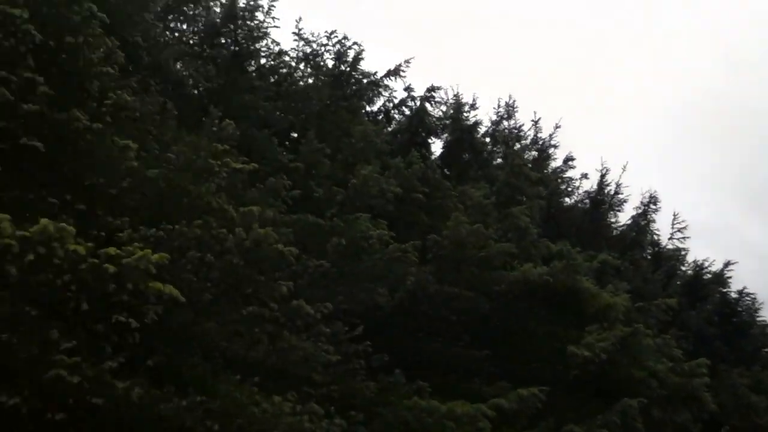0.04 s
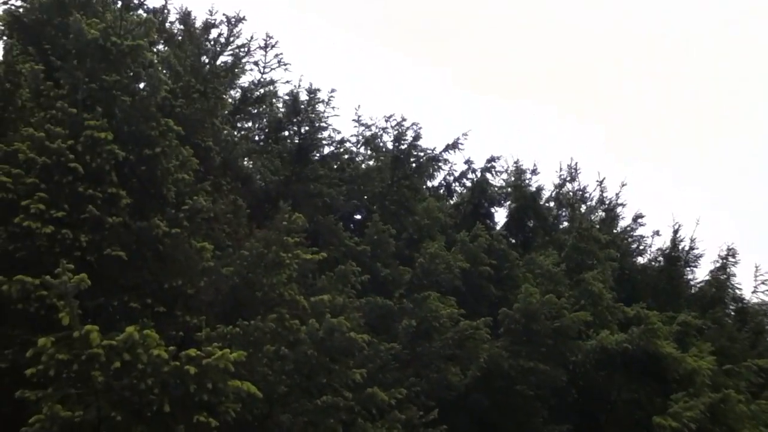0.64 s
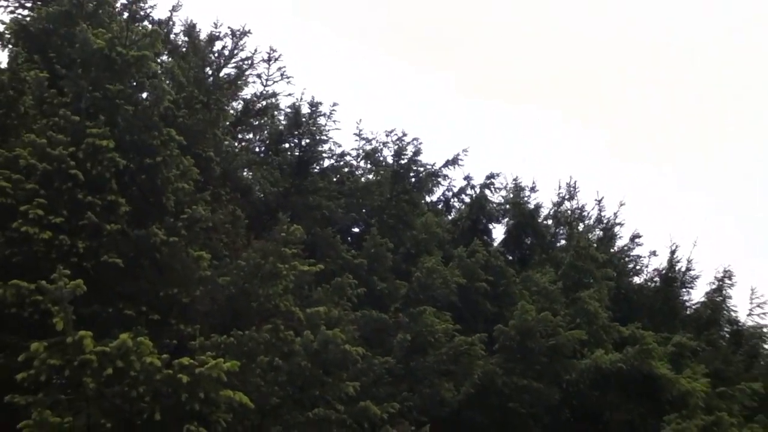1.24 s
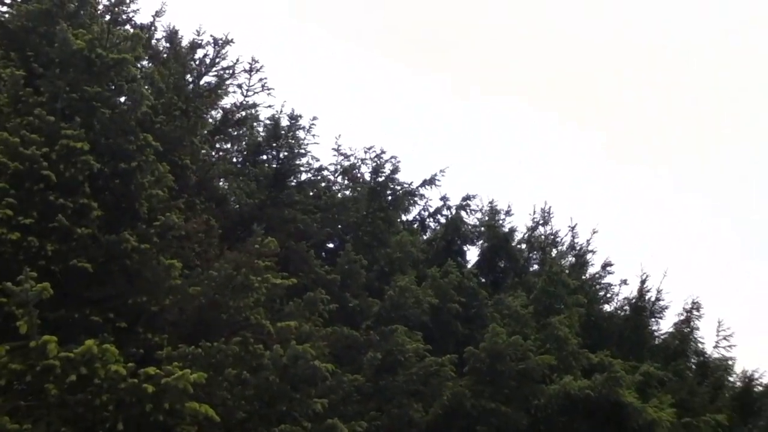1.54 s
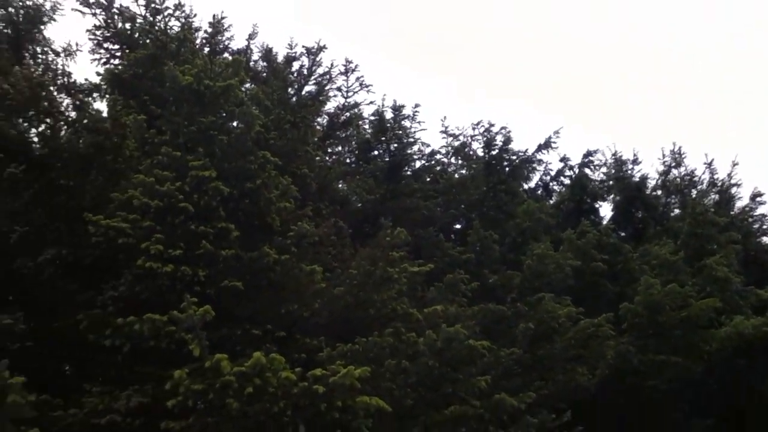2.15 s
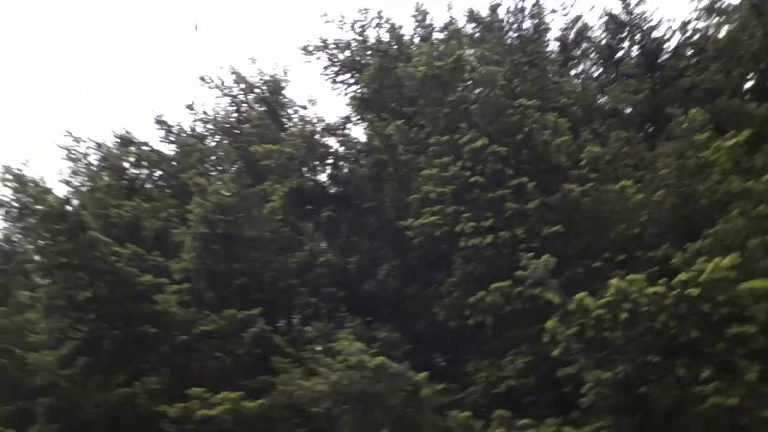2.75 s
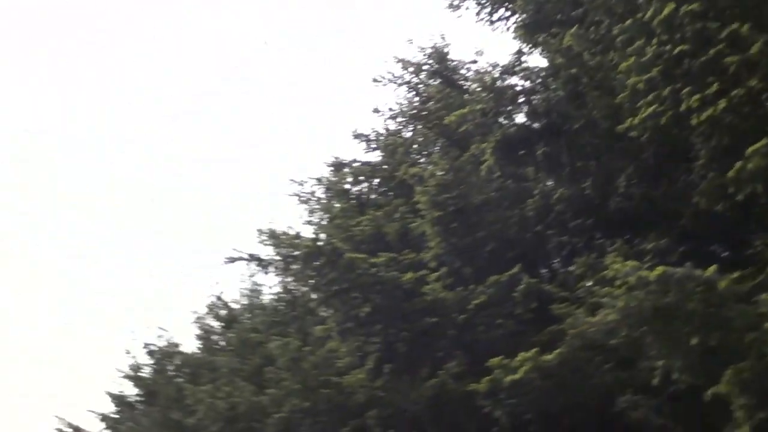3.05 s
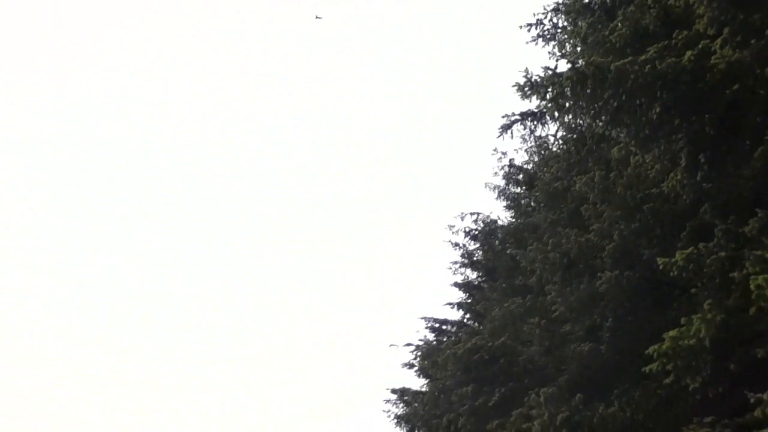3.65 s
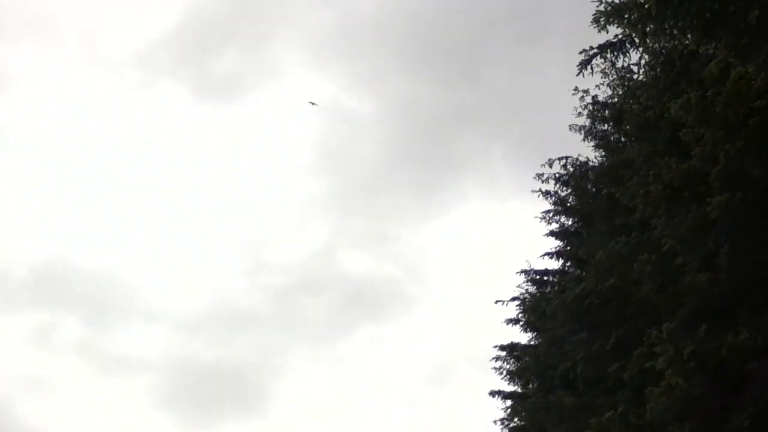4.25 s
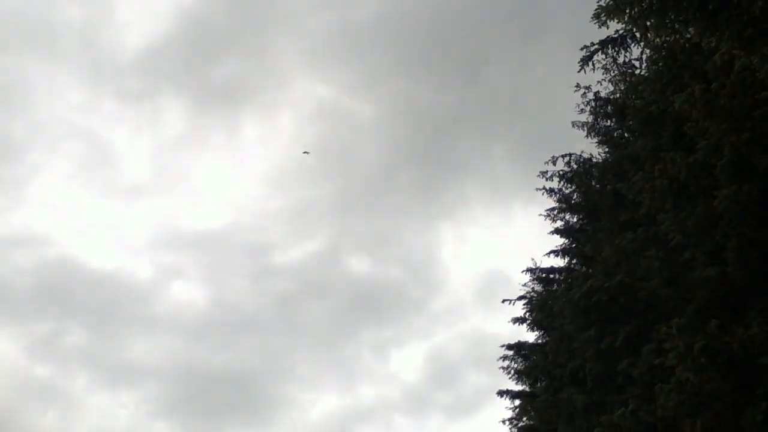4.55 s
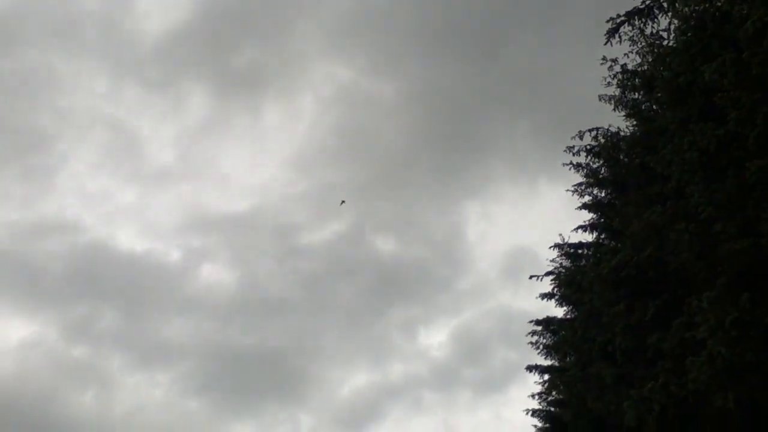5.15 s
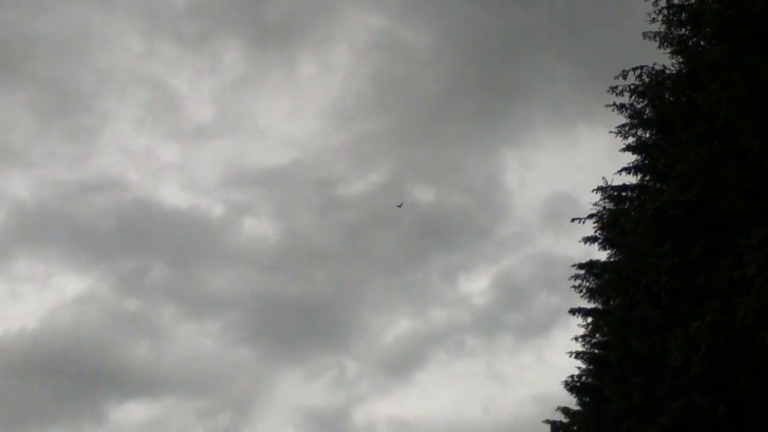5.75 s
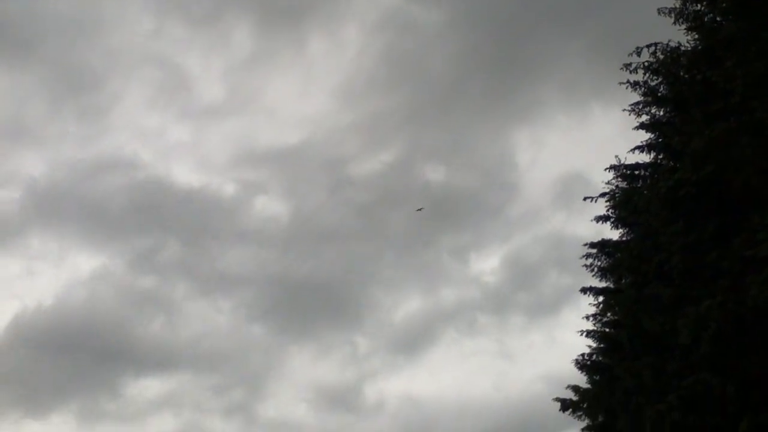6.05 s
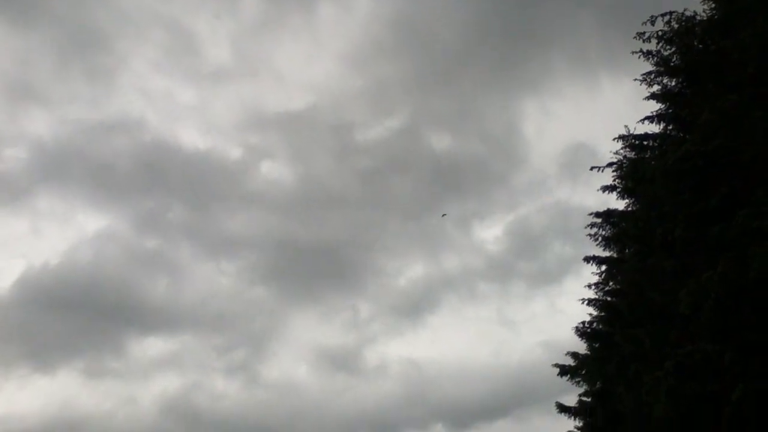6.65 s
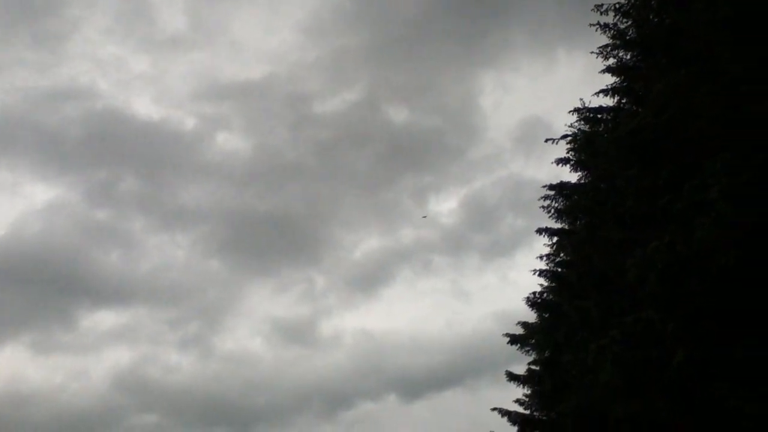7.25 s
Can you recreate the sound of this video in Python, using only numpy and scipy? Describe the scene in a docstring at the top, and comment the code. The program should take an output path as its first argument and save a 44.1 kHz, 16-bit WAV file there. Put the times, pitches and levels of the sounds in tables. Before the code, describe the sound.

A large bird calls overhead at the edge of an evergreen wood. From the start to about 1.8 seconds it gives five loud, short whistles that slide upward, several cracking into a higher note with a slight rasp. Each leaves a soft echo in the trees. During the pause, a hand-held camera makes a few small clicks and bumps between 2.5 and 3.3 seconds. The bird returns with a quick cluster of broken whistles from 3.5 to 4.2 seconds, overlapped near 3.7 by a tiny finger squeak and sharper clicks. From 5 seconds to the end comes a series of slightly longer rising whistles, about two a second, hoarse at first and ending on a softer, level note around 7 seconds. Small birds chirp faintly and occasionally in the distance. A light breeze, soft hiss and faint hand rubbing continue underneath.

```python
"""At the edge of a spruce wood a large bird circles, giving loud rising whistles that break between registers.
A membrane in its syrinx makes the tone, which throat and beak filter; irregular vibration adds rasps.
The ground reflects the calls and the trees scatter them; small birds chirp faintly over a light breeze.
A hand-held camera clicks, bumps and squeaks as it swings up to the sky."""
import sys
import numpy as np
from scipy import signal
from scipy.fft import rfft, irfft
from scipy.io import wavfile
from scipy.ndimage import map_coordinates

SR = 44100
rng = np.random.default_rng(int(sys.argv[2]) if len(sys.argv) > 2 else 0)


def waveform_to_disk(signal):
    """Save audio, clipped to [-1, 1], as 16-bit WAV at the path in sys.argv[1]."""
    frames = np.transpose(np.atleast_2d(signal))
    scaled = np.clip(frames, -1, 1) * 32767
    samples = np.round(scaled).astype(np.int16)
    wavfile.write(sys.argv[1], SR, samples)


N = 321930
T = np.arange(N) / SR
TOP_HZ = 15550  # upper band limit


def whistles(scoop_s=0.00767, accent_db=4.5, accent_s=0.013):
    """One push on the syrinx lifts pitch, level and overtones. Returns the calls and their ground bounce."""
    # Main-register calls: start t/s, end t/s, base f/Hz, creep/(Hz/s), crest t/s, lift/Hz, crest width/s,
    # scoop/Hz, base level/dB, crest level/dB, relative overtone level/dB, ground lag/s, bounce gain/dB
    calls = [ (0.154, 0.229, 1524, 1027, .225, 527, 0.025, 4, -55, -30, -13, .00811, -9.5),
             (0.631, 0.771, 1488, -610, .68, 412.5, .044, 9, -55.5, -33.5, -14, .00325, -7.5),
             (0.879, 1.015, 1574, 757, 1.0, 459.5, 0.023, -4, -44.5, -30, -9.5, .00954, -11.5),
             (1.378, 1.503, 1630, -800, 1.39, 90.5, 0.028, 93, -47, -36.5, -16.5, .00947, -9),
             (1.578, 1.749, 1572, 278, 1.746, 494, 0.036, 2.5, -46, -33.5, -9, .00974, -4),
             (3.568, 3.692, 1823, 924, 3.701, 169, 0.0059, -1, -42, -31, -20.5, .009, -14),
             (4, 4.093, 1830, -3440, 4.099, 503, 0.033, -3, -49, -43, -24, .00917, -10),
             (5.092, 5.151, 1573, -2000, 5.109, 315, 0.026, -0.5, -51, -31, -16.5, .0075, -14),
             (5.248, 5.534, 1599, 519.5, 5.5, 257.4, .034, -6, -47.5, -35.5, -11, .00652, 1),
             (5.804, 6.086, 1560, -7, 6.072, 433.5, 0.078, 137, -45.5, -38.5, -15.5, .00764, -3.5),
             (6.22, 6.442, 1718, 498, 6.43, 117.7, 0.032, 124, -41.5, -34.5, -16.5, .005, -3),
             (6.579, 6.806, 1689, -170, 6.802, 322, 0.045, 219, -46, -38, -14.5, .0061, -3), ]
    out, bounce = np.zeros(N), np.zeros(N)
    for (start, end, base_hz, creep, crest, lift_hz, width, scoop_hz,
         base_db, crest_db, bright_db, lag_s, bounce_db) in calls:
        t, gate = note_gate(start, end, release_s=0.02)
        age = np.maximum(t - start, 0)
        u = (t - crest) / width
        hz = base_hz + creep * age + lift_hz * push(u) - scoop_hz * np.exp(-age / scoop_s)
        swell = push((u + 0.42) / 1.65)  # the level peaks before the pitch, and more broadly
        accent = (scoop_hz > 0) * accent_db * np.exp(-(age / accent_s) ** 2)
        db = base_db + (crest_db - base_db) * swell + accent
        tone = voice(t, hz, overtone_db=bright_db - 5.5 + 4 * push(u), jitter=0.0021,
                     hoarse_jitter=0.07, slope_db=-0.26, flicker_db=3.5, flutter_db=0.5)
        call = gate * undb(db) * tone
        add(out, t[0], call)
        add(bounce, t[0], ground(call, lag_s, bounce_db))
    return out, bounce


def push(u):
    """Effort follows a Lorentzian peak; u is the time from the crest in crest widths."""
    return 1 / (1 + u ** 2)


def syrinx(hz, jitter):
    """The phase of a vibrating membrane is the integral of its trembling frequency."""
    return 2 * np.pi * np.cumsum(hz * (1 + jitter * walk(331.8, len(hz)))) / SR


def voice(t, hz, overtone_db, jitter, hoarse_jitter, slope_db, flicker_db, flutter_db=-0.25):
    """Source and filter: the harmonics of the syrinx sweep through the resonances of the throat."""
    # Transmission of throat and beak: f/Hz, gain/dB
    throat = [(2000, -25), (3200, 5), (3550, -2.5), (3950, -2), (4500, 2.5), (5100, 2), (5800, 1),
              (6700, -2), (7600, -3), (9000, -5), (11000, -15.5), (15000, -60)]
    # Treble loss as the bird turns away or flies further off: t/s, loss above the beak's corner/(dB/kHz)
    dullness = [(.2, 2.5), (.68, 0), (1.0, 2), (1.7, 2), (3.5, 10), (4.2, 11), (5.1, 0), (5.35, 3.5),
                (5.5, 3.5), (6.2, 5.5), (7.3, 5.5)]
    beak_corner_hz, doubling_depth = 4700, 0.31
    rough = roughness(t)
    phase = syrinx(hz, jitter + hoarse_jitter * rough)
    k = np.arange(2, 8)[:, None]  # harmonic numbers
    above_khz = np.maximum(k * hz - beak_corner_hz, 0) / 1000
    loss_db = above_khz * np.interp(t, *np.transpose(dullness))
    weights = gain_at(k * hz, throat) * undb(slope_db * k - loss_db) * (k * hz < TOP_HZ)
    weights /= np.linalg.norm(weights, axis=0)
    # moving air and crossing paths make each overtone fade on its own
    fading = undb(flicker_db * np.array([walk(61.8, len(t)) for _ in k]))
    overtones = (weights * fading * np.sin(k * phase)).sum(0)
    period_doubling = 1 + doubling_depth * rough * np.sin(phase / 2)  # alternate cycles differ
    tone = (np.sin(phase) + undb(overtone_db) * overtones) * period_doubling
    return np.sqrt(2) * tone * undb(flutter_db * walk(125.2, len(t)))


def soft_glides():
    """Short, soft frequency glides around the whistles, one faint echo and a tone overlapping one whistle."""
    # Soft tones: start t/s, end t/s, start f/Hz, middle f/Hz, end f/Hz, level/dB, relative overtones/dB
    notes = [(.265, .325, 1554, 1548, 1583, -48, -18), (.33, .4, 1550, 1555, 1540, -61.5, -18),
             (1.036, 1.104, 1528, 1576, 1725, -45, -21), (1.768, 1.845, 1520, 1525, 1483, -44.5, -18),
             (3.496, 3.525, 1717, 1780, 2040, -40.5, -20), (3.85, 3.871, 1728, 1790, 1980, -39, -14.5),
             (5.27, 5.395, 1840, 1880, 2000, -51, -15), (5.523, 5.575, 1813, 1703, 1773, -37.5, -23),
             (7.06, 7.31, 1530, 1489, 1484, -49, -14.5)]
    return glides(notes, overtone_db=-3.5, jitter=0.0018, hoarse_jitter=0.03, slope_db=-1.5, flicker_db=3.5)


def register_breaks():
    """The vibration jumps abruptly into a higher register."""
    # High notes: start t/s, end t/s, start f/Hz, middle f/Hz, end f/Hz, level/dB, relative overtones/dB
    notes = [(.226, .255, 2693, 2580, 2400, -40, -3), (1.002, 1.033, 2614, 2564, 2344, -40, -1.5),
             (1.737, 1.769, 2670, 2566, 2443, -39, -4), (3.526, 3.561, 2514, 2436, 2120, -44, -9.5),
             (3.702, 3.776, 2296, 2208, 2880, -40.5, -16), (3.873, 4.001, 2430, 2188, 2160, -45, -17.5),
             (4.094, 4.169, 2300, 2597, 2662, -45, -9.5), (5.011, 5.059, 2380, 2605, 2460, -41.5, -31),
             (5.399, 5.484, 2370, 2532, 2250, -45.5, -16), (6.076, 6.115, 2476, 2514, 2690, -41, -10),
             (6.438, 6.475, 2485, 2568, 2626, -41.5, -10), (6.803, 6.852, 2613, 2535, 2522, -41.5, -8)]
    return glides(notes, overtone_db=-7, jitter=0.0075, hoarse_jitter=0.04, slope_db=1, flicker_db=1.5)


def glides(notes, overtone_db, **timbre):
    """Frequency modulation: each note follows a parabola through three pitches."""
    out = np.zeros(N)
    for start, end, start_hz, middle_hz, end_hz, db, bright_db in notes:
        t, gate = note_gate(start, end)
        u = np.interp(t, [start, end], [-1, 1])
        bend_hz = (start_hz + end_hz) / 2 - middle_hz
        hz = middle_hz + u * (end_hz - start_hz) / 2 + u ** 2 * bend_hz
        add(out, t[0], gate * undb(db) * voice(t, hz, bright_db + overtone_db, **timbre))
    return out


def moans(jitter=0.0247, hoarse_jitter=0.23, swell_db=8.5):
    """A low harmonic series, strong in its first two partials, bends up and swells into a call."""
    # Low lead-in notes: start t/s, end t/s, start f/Hz, end f/Hz, relative level/dB
    notes = [(0, 0.147, 1009, 1162, -50.5), (.772, 0.873, 975, 1240, -48), (1.349, 1.377, 970, 1327, -42.5),
             (1.51, 1.569, 1024, 1214, -44.5), (5.182, 5.247, 958, 1190, -47),
             (5.78, 5.808, 936, 1113, -50), (6.188, 6.222, 985, 1160, -49.5),
             (6.571, 6.583, 980, 1180, -43.5), (7.034, 7.059, 948, 1230, -46.5)]
    out = np.zeros(N)
    for start, end, start_hz, end_hz, db in notes:
        t, gate = note_gate(start, end)
        u = np.interp(t, [start, end], [0, 1])
        hz = start_hz + (end_hz - start_hz) * u ** 3.2
        phase = syrinx(hz, jitter + hoarse_jitter * roughness(t))
        upper = sum(np.sin(k * phase) * 3 / k for k in range(3, 7))
        tone = np.sin(phase) + undb(3) * np.sin(2 * phase) + undb(-15) * upper
        add(out, t[0], np.sqrt(2) * gate * undb(db - 14.75 + swell_db * u) * tone)
    return out


def rasps(grain_db=0.5):
    """Aperiodic vibration: the membrane rattles before it locks on a pitch or as it jumps."""
    # Spectrum of the rattle: f/Hz, level/dB
    spectrum = [(500, -46), (850, -22), (1300, -3), (1750, 1), (2500, 3), (3000, -9.5), (3800, -2.5),
                (4500, -5), (5300, -11), (7500, -17), (11000, -29), (15000, -67)]
    rattle = unit(noise(spectrum) * undb(grain_db * walk(370)))
    return undb(-0.5) * hoarseness() * rattle


def hoarseness():
    """The amplitude envelope of the rattle is a sum of Gaussian pulses."""
    # Hoarse catches in the voice: centre t/s, duration/s, relative level/dB
    catches = [(0.247, 0.046, -51), (0.628, 0.051, -46), (1.016, 0.038, -63), (1.371, 0.035, -51.5),
               (1.754, 0.029, -56), (3.513, 0.036, -50.5), (5.019, 0.054, -52.5), (5.075, 0.036, -46),
               (5.086, 0.02, -39.5), (5.803, 0.031, -53.5), (6.213, 0.022, -54.5), (6.579, .015, -54)]
    return sum(undb(db) * np.exp(-(2 * (T - centre) / length) ** 2) for centre, length, db in catches)


def roughness(t):
    """Irregularity of the vibration at times t, normalised to 1 at its hoarsest."""
    envelope = hoarseness()
    return np.interp(t, T, envelope / envelope.max())


def ground(x, lag_s, bounce_db):
    """Two-path interference: a delayed reflection beats against the direct sound as the pitch glides."""
    t = T[:len(x)]
    return undb(bounce_db) * np.interp(t - lag_s, t, x, left=0)


def tree_echoes(bird, doppler=0.015, turn_hz=0.8):
    """Doppler effect: the bird nears some trees as it leaves others, so the echoes spread in pitch."""
    # Strength of the call towards the trees: t/s, gain/dB
    exposure = [(0, 4.5), (2, 6), (3.5, 0), (4.2, 9), (5, 2.5), (7.3, 9.5)]
    incident = bird * undb(np.interp(T, *np.transpose(exposure)))
    out = np.zeros(N)
    for bearing in np.linspace(0, 2 * np.pi, 3, endpoint=False):
        lag_s = doppler / (2 * np.pi * turn_hz) * (1 + np.sin(2 * np.pi * turn_hz * T + bearing))
        shifted = np.interp(T - lag_s, T, incident, left=0)
        out += wood(shifted, wet_db=-19, t60=0.98, near_s=0.053, near_db=5)
    return out


def wood(x, wet_db, t60, near_s, near_db):
    """Diffuse scattering: near twigs give a short bright return, countless branches a long dull tail."""
    # Spectrum of the reverberant tail: f/Hz, level/dB
    tail_spectrum = [(500, 5), (1600, -3), (2600, -2), (4200, 0.5), (6000, -7.5), (10000, -19)]
    # Spectrum of the near scatter: f/Hz, level/dB
    twig_spectrum = [(500, -40), (1700, -5), (2600, -1), (6000, 3), (10000, 5)]
    t = T[:2 * SR]
    tail = noise(tail_spectrum, len(t)) * np.exp(-np.log(1000) * t / t60)
    near = noise(twig_spectrum, len(t)) * np.exp(-t / near_s)
    build_up = 1 - np.exp(-t / 0.0013)
    tail_energy = SR * t60 / (2 * np.log(1000))
    response = (tail + undb(near_db) * near) * build_up / np.sqrt(tail_energy)
    return undb(wet_db) * signal.fftconvolve(x, response)[:N]


def camera_knocks(crack_db=-3, hard_tick_hz=1540, casing_hz=3500):
    """Each impact excites a damped mode and a crack of noise, both low-passed by the casing."""
    # Clicks and bumps of the camera body: t/s, relative level/dB, ring f/Hz, 60 dB decay time/s
    knocks = [(2.464, -44.5, 940, 0.0056), (2.711, -47, 700, .012), (2.743, -33.5, 1700, 0.0017),
              (2.7455, -37.5, 640, 0.0066), (2.7663, -34.5, 1700, 0.0027), (2.8481, -38, 1210, 0.0054),
              (3.2834, -38.5, 450, 0.01), (3.512, -57, 54.6, .15), (3.717, -44.5, 930, 0.047),
              (3.722, -21.5, 1540, 0.00093), (3.738, -31.5, 1510, 0.0059), (3.745, -36, 950, 0.0047),
              (3.761, -44.5, 406, 0.043), (3.768, -35, 1060, 0.0024)]
    out, t = np.zeros(N), T[:SR // 4]
    for start, db, hz, t60 in knocks:
        hardness = min(hz / hard_tick_hz, 1) ** 2  # soft, low bumps have almost no crack
        ring = np.sin(2 * np.pi * hz * t) + hardness * undb(crack_db) * rng.standard_normal(len(t))
        add(out, start, undb(db + 3) * ring * np.exp(-np.log(1000) * t / t60))
    return signal.sosfilt(signal.butter(4, casing_hz, fs=SR, output="sos"), out)


def finger_squeak(start_s=3.662, length_s=0.05, from_hz=780, to_hz=1600):
    """Stick-slip friction: a finger slides on the casing with a short, rough rising tone."""
    out, u = np.zeros(N), np.linspace(0, 1, int(length_s * SR))
    phase = syrinx(from_hz + (to_hz - from_hz) * u ** 2, jitter=0.215)
    envelope = undb(-52) * np.sqrt(np.abs(np.sin(np.pi * u)))
    add(out, start_s, envelope * (np.sin(phase) + np.sin(2 * phase) / 2))
    return out


def hand_rub(grain_db=4.7):
    """Sliding friction of the hand on the camera makes dull, uneven noise."""
    # Strength of the rubbing: t/s, level/dB
    grip = [(0, -61), (.5, -71.5), (2.1, -75.5), (2.45, -73), (2.75, -68), (3.05, -73), (3.4, -83),
            (3.75, -62), (3.95, -71.5), (7.3, -73)]
    # Spectrum of the rubbing: f/Hz, level/dB
    spectrum = [(60, -38), (200, 2), (450, -3.5), (1000, -9), (2000, -22), (6000, -21)]
    rub = unit(noise(spectrum) * undb(grain_db * walk(45)))
    return rub * undb(np.interp(T, *np.transpose(grip)))


def small_birds():
    """Thin frequency sweeps from deep in the trees arrive with strong reverberation."""
    # Distant chirps: t/s, duration/s, start f/Hz, end f/Hz, level/dB
    chirps = [(1.269, 0.041, 3160, 4030, -55), (1.865, 0.06, 3120, 4040, -59),
              (2.614, 0.15, 7500, 8300, -66.5), (2.788, 0.052, 8000, 7400, -64),
              (2.833, .06, 7900, 8100, -66), (2.928, 0.058, 3210, 4000, -62),
              (4.368, 0.061, 3120, 3920, -64), (4.71, 0.095, 4420, 4230, -65),
              (5.658, 0.08, 3120, 3850, -67)]
    out = np.zeros(N)
    for start, length, start_hz, end_hz, db in chirps:
        u = np.linspace(0, 1, int(length * SR))
        phase = syrinx(start_hz + (end_hz - start_hz) * u ** 2, jitter=0.014)
        add(out, start, undb(db) * np.sin(np.pi * u) * np.sin(phase))
    return out + wood(out, wet_db=-2.5, t60=0.72, near_s=0.035, near_db=0)


def air(gust_db=2.3, hum_hz=120):
    """A light breeze modulates the amplitude of low noise, beneath steady hiss and a faint hum."""
    # Background noise: f/Hz, relative spectral density level/dB
    spectrum = [(15, -49), (25, -15), (91, -3), (113, -0.5), (246, -4), (703, -6), (1170, -11), (1900, -12),
                (2060, -14.5), (2770, -14.5), (3530, -15.5), (4260, -15.5), (4750, -17.5), (7910, -17.5),
                (15500, -22.5)]
    broadband = unit(noise(spectrum))
    low = signal.sosfiltfilt(signal.butter(2, 900, fs=SR, output="sos"), broadband)
    breeze = low * undb(gust_db * walk(4.7))
    hiss = broadband - low
    hum = np.sqrt(2) * np.sin(2 * np.pi * hum_hz * T)
    return undb(-60.5) * (breeze + hiss) + undb(-78) * hum


def note_gate(start, end, attack_s=0.012, release_s=0.012):
    """Times of one note and its envelope with raised-cosine edges."""
    t = np.arange(start - attack_s / 2, end + release_s / 2, 1 / SR)
    opening = np.minimum((t - t[0]) / attack_s, (t[-1] - t) / release_s)
    return t, np.sin(np.pi / 2 * np.clip(opening, 0, 1)) ** 2


def undb(db):
    """Amplitude ratio of a level in decibels."""
    return 10 ** (np.asarray(db) / 20)


def unit(x):
    """Normalisation to rms 1."""
    return x / np.sqrt(np.mean(x ** 2))


def gain_at(hz, spectrum):
    """Gain interpolated in log frequency from rows of f/Hz, level/dB."""
    f, db = np.transpose(spectrum)
    return undb(np.interp(np.log(hz + 1), np.log(f), db))


def noise(spectrum, size=N):
    """Spectral shaping of white noise by rows of f/Hz, level/dB."""
    gain = gain_at(np.fft.rfftfreq(size, 1 / SR), spectrum)
    return irfft(rfft(rng.standard_normal(size)) * gain, size)


def walk(rate, size=N):
    """Smooth random modulation that changes rate times a second; standard deviation near 1."""
    steps = rng.standard_normal(4096)
    return map_coordinates(steps, [np.arange(size) * rate / SR], order=2, mode="mirror")


def add(out, start, sound):
    """Superposition of a sound at a time in seconds."""
    i = max(int(start * SR), 0)
    out[i:i + len(sound)] += sound[:max(N - i, 0)]


def scene():
    """The circling bird, its echoes, the camera and the background add linearly in one channel."""
    calls, call_bounce = whistles()
    short_notes = soft_glides() + register_breaks() + moans() + rasps()
    bird = calls + short_notes
    echoes = call_bounce + ground(short_notes, lag_s=0.009, bounce_db=-11) + tree_echoes(bird)
    distant_birds = small_birds()
    handling = camera_knocks() + hand_rub() + finger_squeak()
    return (bird + echoes + handling + distant_birds + air())[None]


def record(dry):
    """Band limiting: an elliptic low-pass cuts the top steeply."""
    return signal.sosfilt(signal.ellip(10, .2, 70, TOP_HZ, fs=SR, output="sos"), dry)


dry = scene()
out = record(dry)
waveform_to_disk(out)
```